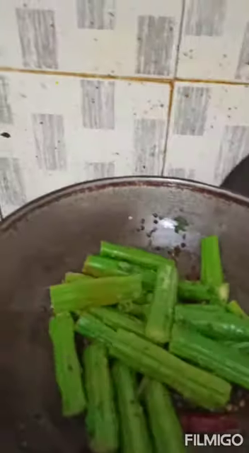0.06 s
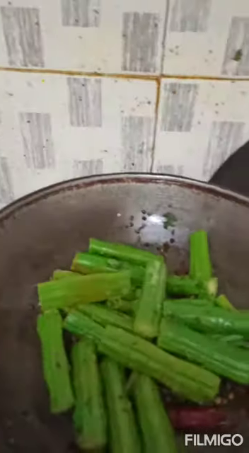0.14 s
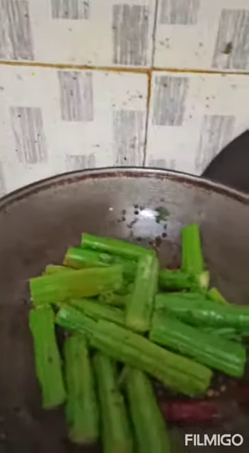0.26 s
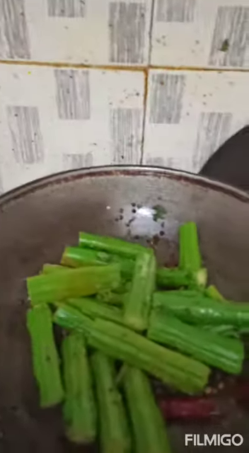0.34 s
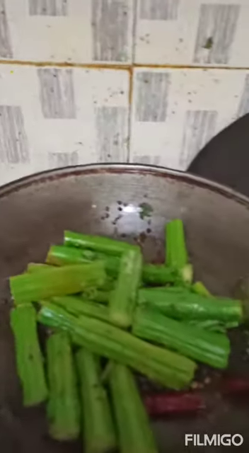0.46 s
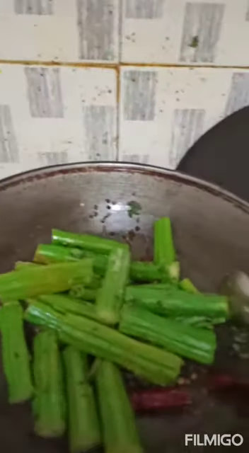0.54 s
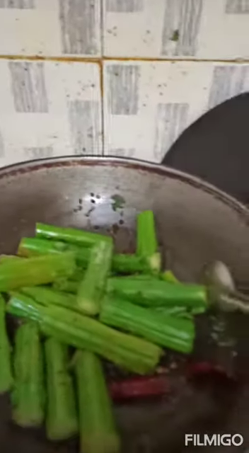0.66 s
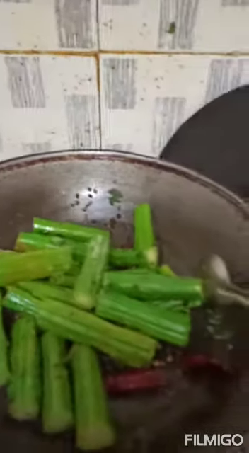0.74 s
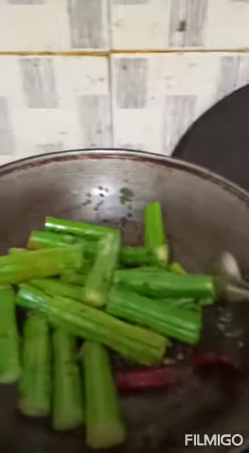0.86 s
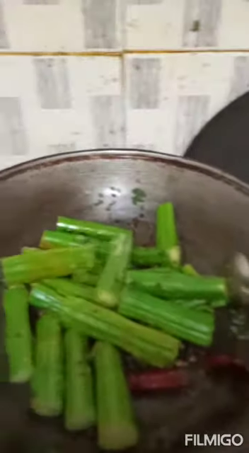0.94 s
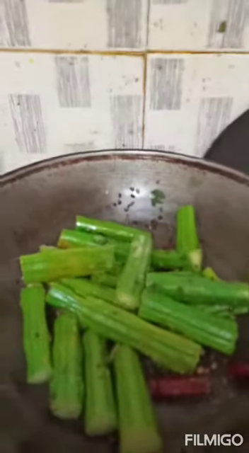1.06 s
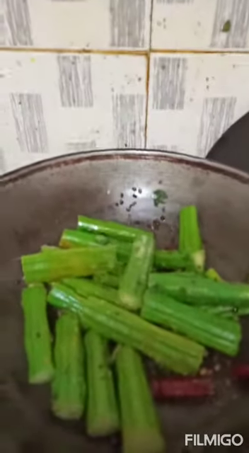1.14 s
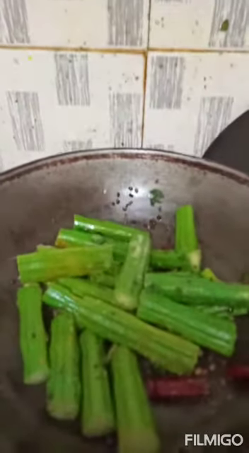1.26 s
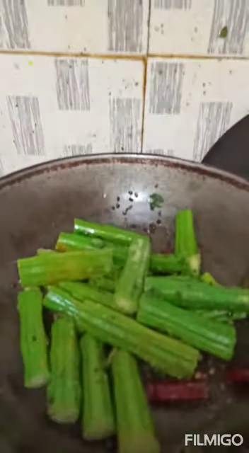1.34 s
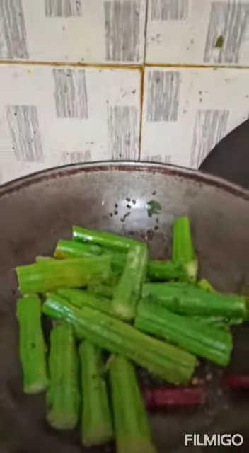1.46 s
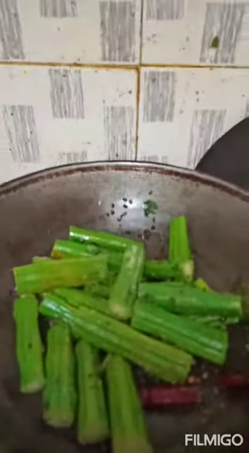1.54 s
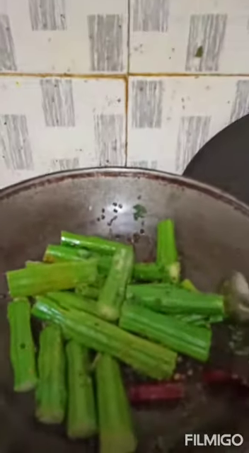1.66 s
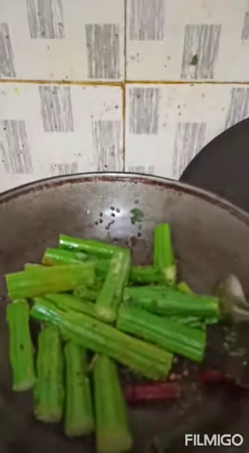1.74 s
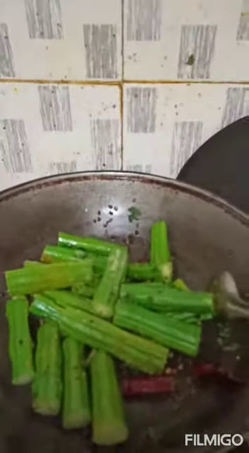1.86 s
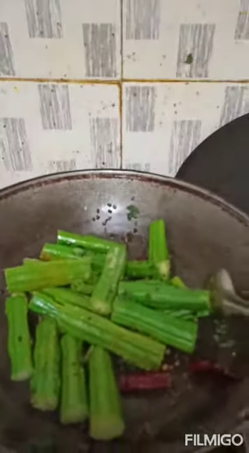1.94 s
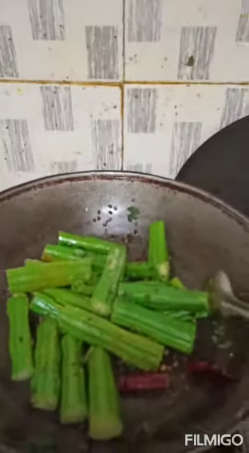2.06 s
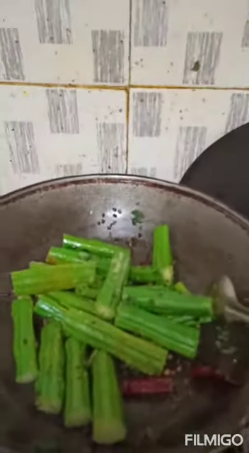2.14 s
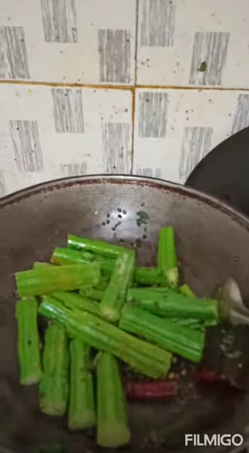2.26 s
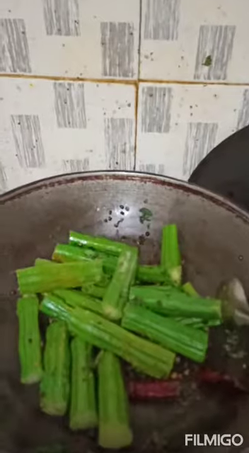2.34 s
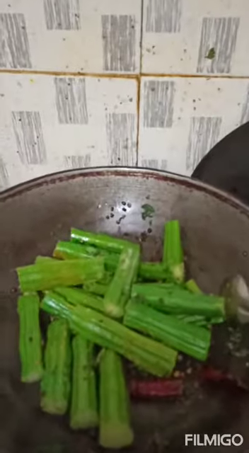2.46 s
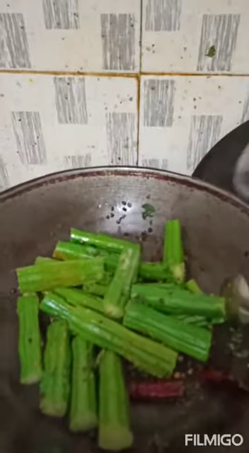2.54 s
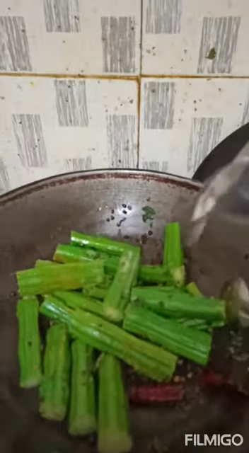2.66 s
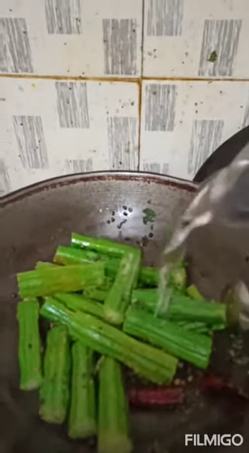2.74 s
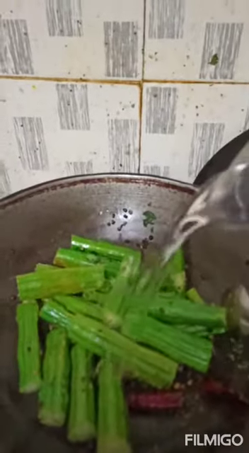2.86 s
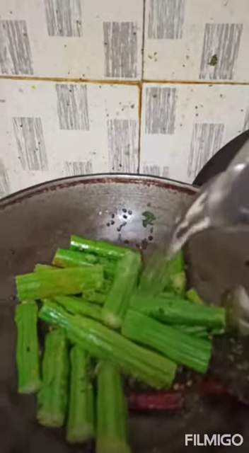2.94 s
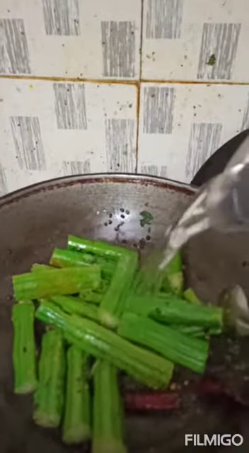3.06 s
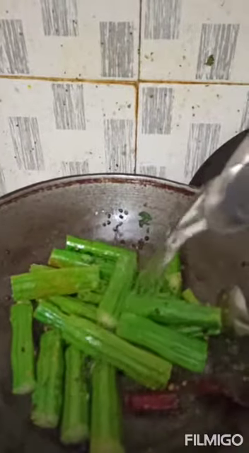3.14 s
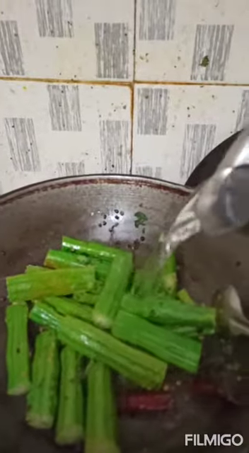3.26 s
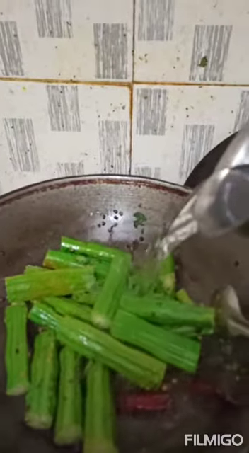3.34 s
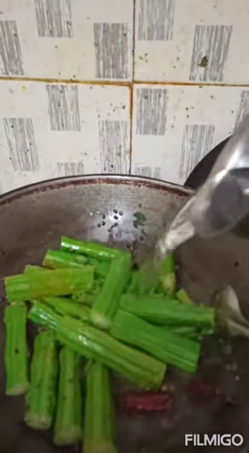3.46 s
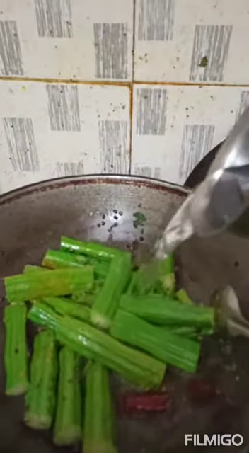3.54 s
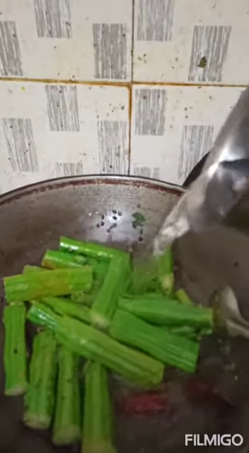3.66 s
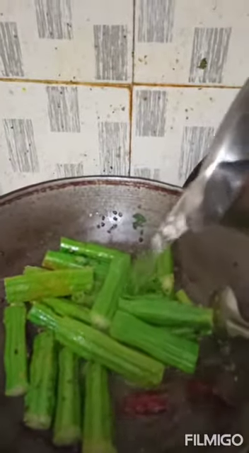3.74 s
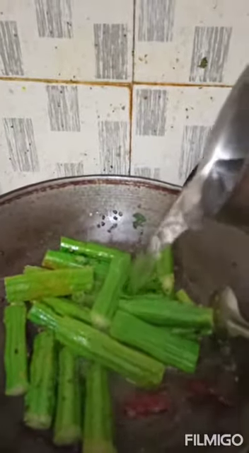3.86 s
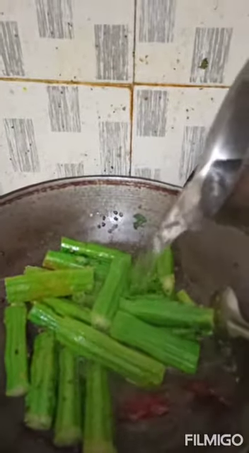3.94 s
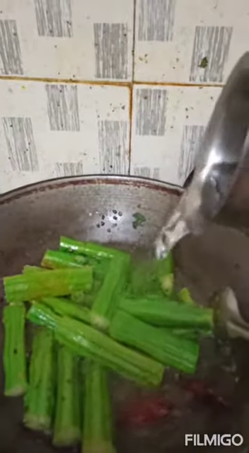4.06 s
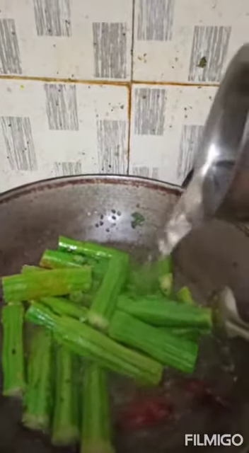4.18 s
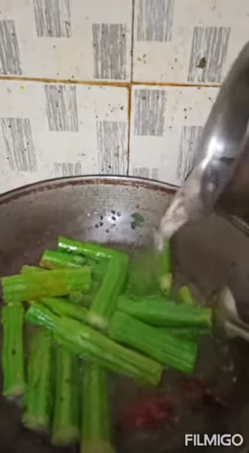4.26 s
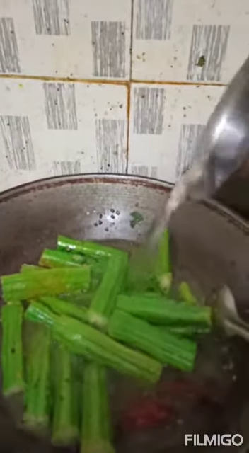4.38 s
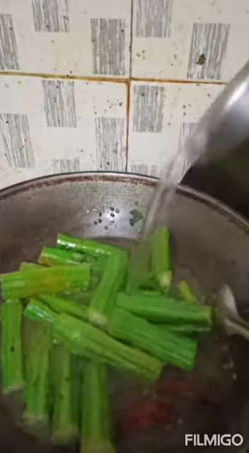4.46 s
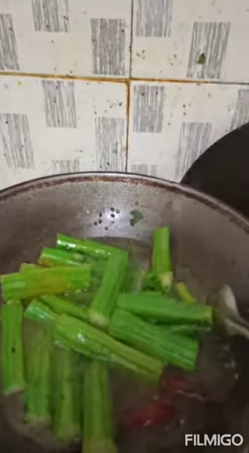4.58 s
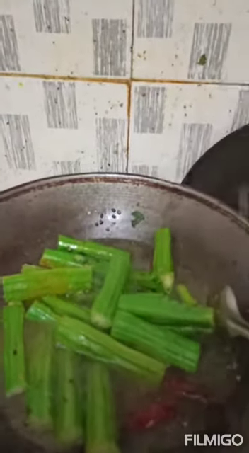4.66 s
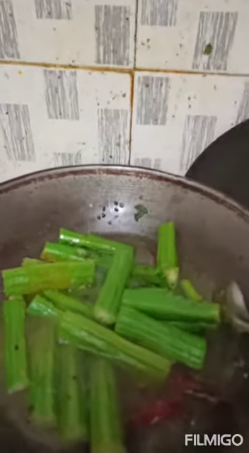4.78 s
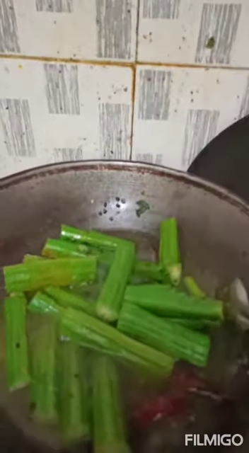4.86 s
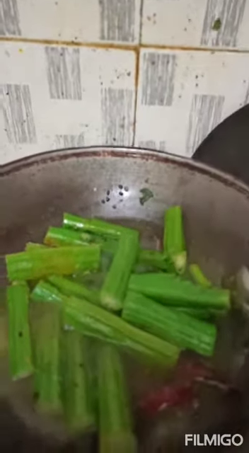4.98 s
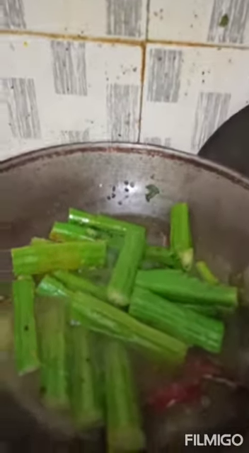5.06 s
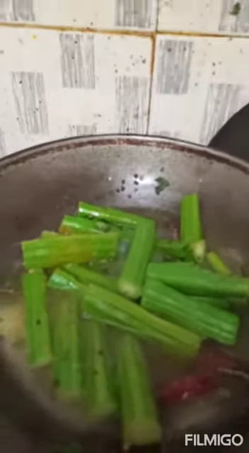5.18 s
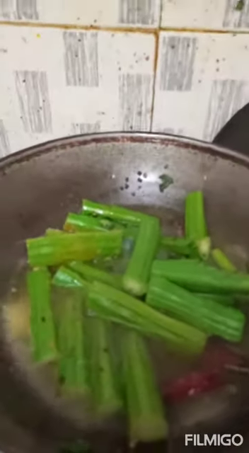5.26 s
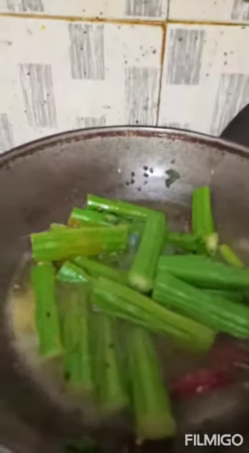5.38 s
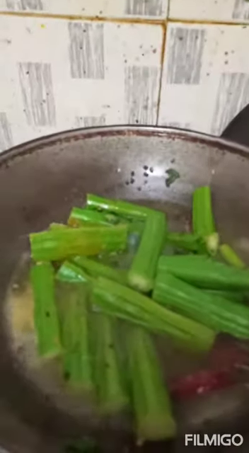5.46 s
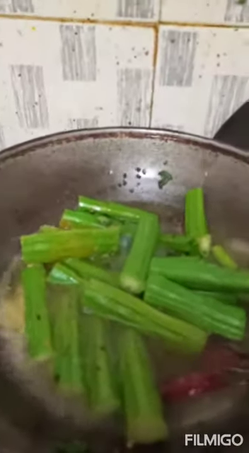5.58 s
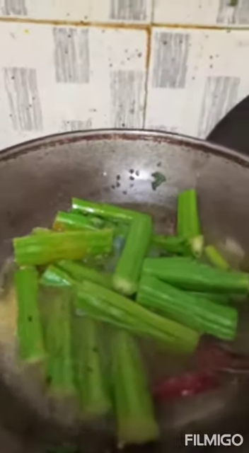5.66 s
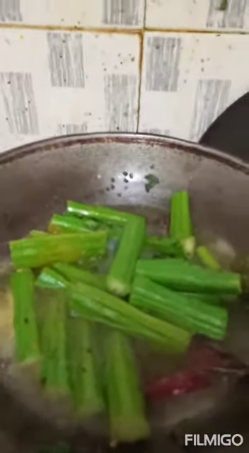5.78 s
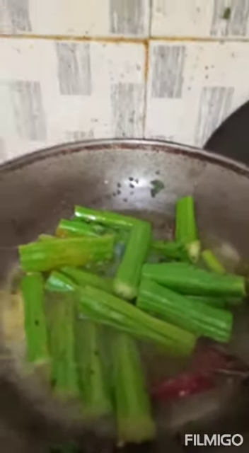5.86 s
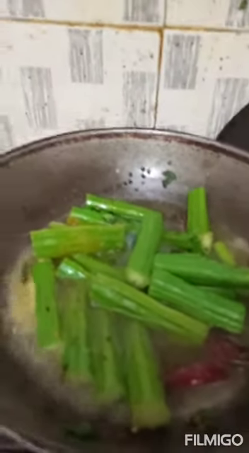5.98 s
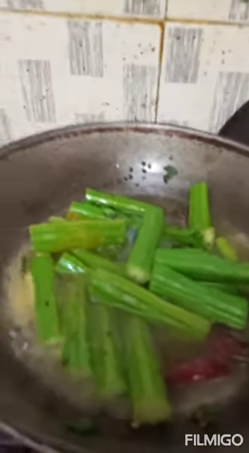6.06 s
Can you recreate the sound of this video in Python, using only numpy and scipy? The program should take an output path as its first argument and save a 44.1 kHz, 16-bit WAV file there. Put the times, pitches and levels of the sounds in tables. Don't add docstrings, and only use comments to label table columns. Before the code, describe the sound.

A crisp, moderately quiet frying sizzle with scattered snapping droplets, heard close in stereo. About halfway, poured water makes a strong burst of steam and a few sharp spits, then the sound falls to a duller simmer with small rising bubble tones and a humming pan. Near the end a metal jug is set down with a clank and small rebounds. Faint kitchen rumble behind; slightly rough phone treble.

```python
import sys
import numpy as np
from scipy import signal
from scipy.fft import rfft, irfft
from scipy.io import wavfile
from scipy.ndimage import uniform_filter1d

SR = 44100
rng = np.random.default_rng(int(sys.argv[2]) if len(sys.argv) > 2 else 0)


def amplitude_ratio(level_db):
    exponent = np.asarray(level_db, float) / 20
    return 10 ** exponent


def to_wav(s):
    ch = np.atleast_2d(s).T
    pcm = np.round(np.clip(ch, -1, 1) * 32767)
    wavfile.write(sys.argv[1], SR, pcm.astype(np.int16))


N = 269926
TIME = np.arange(N) / SR
HZ = np.maximum(np.arange(N // 2 + 1) * SR / N, 1)


def unit(x):
    return x / np.sqrt(np.mean(x ** 2))


def along(table, hz):
    points = np.array(table)
    return np.interp(np.log(hz), np.log(points[:, 0]), points[:, 1])


def walk(rate):
    hold = int(SR / rate)
    steps = np.repeat(rng.standard_normal(N // hold + 1), hold)
    slewed = uniform_filter1d(uniform_filter1d(steps, hold), hold)
    return unit(slewed[:N])


def pair(likeness):
    mid, side = rfft(rng.standard_normal((2, N)))
    return np.sqrt(1 + likeness) * mid + np.sqrt(1 - likeness) * side * np.array([[1], [-1]])


def puffs(rate, spread_db, fade_s):
    when, size = rng.random((2, N))
    power = (when < rate / SR) * amplitude_ratio(-2 * spread_db * np.log(size + 0.0023))
    fade = np.exp(-1 / (fade_s * SR))
    burst = signal.lfilter([1], [1, -fade], power)
    return burst / burst.mean()


def ring(x, modes, turn):
    out = 0
    for k, (hz, db, t60) in enumerate(modes):
        pole = np.exp(2j * np.pi * hz / SR - np.log(1000) / (t60 * SR))
        mode = signal.lfilter([1], [1, -pole], x)
        out = out + amplitude_ratio(db) * np.imag(np.exp(1j * turn * k) * mode)
    return out


def depth(t, hz=700):
    half_full_s, rise_s, lag_s_per_octave = 3.6, 0.24, 0.24
    late = lag_s_per_octave * max(np.log2(700 / hz), 0)
    return .5 + .5 * np.tanh((t - half_full_s - late) / rise_s / 2)


def size_db(hz, t):
    # f/Hz, share of steam swing followed/0-1, full-water gain/dB
    sizes = [(350, 0.52, 13), (1090, 0.66, 6.5), (3500, 0.86, 1.5), (7000, 1.01, -1), (12600, 0.76, -2.5)]
    # t/s, level/dB, spray over fizz/dB
    boil = [(0, -28.5, 0), (.5, -29.5, -0.5), (1.1, -29.5, -0.5), (1.77, -30, 0), (2.42, -31.5, 0.5),
            (2.56, -29.5, 0), (2.73, -34, 0), (3.08, -28, 0.5), (3.24, -21.5, -0.5), (3.43, -18, -0.5),
            (3.6, -19, -2), (3.82, -19.5, -2), (3.99, -22, 0), (4.22, -24, 2.5), (4.32, -22, 2.5),
            (4.67, -27.5, -1), (5.28, -28, 0), (6.12, -31.5, 0.5)]
    spray_hz = [4700, 6100]
    # t/s, extra spray/dB
    jolts = [
        (.8, 0.5),
        (2.55, -1.5),
        (3.39, -0.5),
        (4.005, 6.5),
        (4.06, 1),
        (4.3, -1),
    ]
    jolt_fade_s = 0.04
    size_hz, follow, wet_db = np.transpose(sizes)
    s, steam_db, spray_db = np.transpose(boil)

    def at_size(values):
        return np.interp(np.log(hz), np.log(size_hz), values)

    fine = np.interp(hz, spray_hz, [0, 1])
    jolt = sum(db * (t >= at) * np.exp(-abs(t - at) / jolt_fade_s) for at, db in jolts)
    steam = np.interp(t, s, steam_db) + 30
    steam = steam + (fine - .5) * np.interp(t, s, spray_db) + fine * jolt
    return at_size(follow) * steam + at_size(wet_db) * depth(t, hz)


def sizzle():
    # f/Hz, level per Hz/dB
    fry = [(150, -32.5), (200, -30), (320, -23), (400, -25), (560, -25.5), (750, -13.5), (1150, -14.5),
           (2150, -10.5), (2900, -3.5), (3680, -2.5), (4700, -2.5)]
    # f/Hz, likeness/0-1
    likeness = [(100, 0.97), (300, 0.46), (600, 0.36), (1000, 0.41), (1800, 0.54), (8000, 0.2)]
    # f/Hz, left minus right/dB
    lean = [(100, -6), (250, 5.5), (600, -0.5), (1200, -4.5), (2300, 5.5), (4000, 1), (8000, -3.5),
            (14000, -0.5)]
    # f/Hz, right ahead/rad
    port_turn = [(300, 0.67), (600, 0.16), (1000, 1.44), (2400, 1.24)]
    # f/Hz, width/Hz, gain/dB
    pan_ring = [(162, 20, 10), (455, 20, 9), (597, 31, 8.5), (880, 20, 4.5), (980, 20, 0.5), (1214, 40, 6),
                (1306, 26, 4.5), (1724, 34, 7.5), (1886, 20, 5.5), (2130, 51, 3.5), (2380, 32, 8.5),
                (2485, 16, 5), (3576, 25, 5.5), (7350, 30, 2.5)]
    fizz_db = -34
    noise = pair(np.clip(along(likeness, HZ), 0, 1))
    noise = noise * np.exp(np.outer([0, 1j], along(port_turn, HZ)))
    cracks = puffs(400, 2.6, 0.00075)
    surge, near = walk(24), walk(18)
    surge = surge - uniform_filter1d(surge, size=9000)
    near = near - uniform_filter1d(near, size=9000)
    out = 0
    for hz in 150 * 2 ** np.arange(0, 7, .5):
        mask = np.cos(np.pi * np.clip(np.log2(HZ / hz), -.5, .5))
        near = 1.076 * near + 0.17 * walk(20)
        db = fizz_db + size_db(hz, TIME) + 0.49 * surge + (0.38 + 250 / hz) * near
        crisp = min(hz / 2500, 1)
        power = 1 + crisp * 0.23 * cracks + 0.27 * puffs(hz / 12, 1.4, 3.3 / hz)
        out = out + amplitude_ratio(db) * np.sqrt(power / power.mean()) * irfft(noise * mask, N)
    flat_top = np.clip(HZ, 0, 4650)
    colour = amplitude_ratio(along(fry, flat_top) + along(lean, HZ) * np.array([[.5], [-.5]]))
    for hz, width, db in pan_ring:
        colour = colour * (1 + (amplitude_ratio(db) - 1) / (1 + (2 * (HZ - hz) / width) ** 2))
    return irfft(rfft(out) * colour, N) * amplitude_ratio(9.5)


def pops():
    # t/s, peak/dB, ring f/Hz, left minus right/dB
    droplets = [(0.158, -12, 7600, -14), (0.323, -16, 3780, -1), (0.4643, -13, 4170, 0),
                (0.655, -12, 6400, -4), (0.7083, -12, 7000, -11), (0.7596, -18, 7400, -3),
                (0.796, -12, 6640, 8), (1.4516, -24, 7510, 10), (1.576, -18, 7900, -3),
                (1.618, -12, 6400, -6), (1.704, -19, 3570, -15), (1.809, -28, 7370, 8),
                (2.4701, -17, 3850, -12), (2.558, -11, 7500, 0.5), (2.58, -30, 7530, -12),
                (2.7894, -13, 7700, -12.5), (2.8588, -16, 6840, -15), (2.9264, -12, 7460, -18),
                (2.9685, -12.5, 7000, 6), (3.329, -5, 6440, 13), (3.681, -9, 7360, 9),
                (4.0044, -2, 6100, -23), (4.253, -14, 6140, 5), (4.5145, -12, 7560, -11),
                (4.765, -11, 4100, -34), (5.3334, -12, 7500, -7), (5.7505, -19, 6900, -20),
                (5.917, -12, 7500, 25), (6.0028, -19, 2740, -1)]
    out, age = np.zeros((2, N + 512)), np.arange(512) / SR
    for t, db, hz, pan_db in droplets:
        snap = 0.33 * np.gradient(rng.standard_normal(512))
        crack = (np.sin(2 * np.pi * hz * age) + snap) * np.exp(-age * hz / 9)
        crack = crack - uniform_filter1d(crack, size=40)
        side_db = np.clip([[pan_db], [-pan_db]], -6, 6) / 2
        i = int(t * SR)
        out[:, i:i + 512] += amplitude_ratio(db - 6.0 + side_db) * crack
    return out[:, :N]


def bubbles(count=260):
    pool_db = -58
    out, age = np.zeros((2, N + 4096)), np.arange(4096) / SR
    for when, pitch, size, side in rng.random((count, 4)):
        t = 3.2 + when * 3.4
        hz = 380 * 2 ** (2.2 * pitch)
        swell = age * hz * np.exp(-age * hz / 1.88)
        tone = np.sin(2 * np.pi * hz * age * (1 + 0.015 * hz * age)) * swell
        db = pool_db + size_db(350, t) - 3.0 * np.log(size + 0.0085)
        i = min(int(t * SR), N)
        out[:, i:i + 4096] += amplitude_ratio(db) * tone * np.array([[0.26 + side], [1.3 - side]]) ** .5
    return out[:, :N]


def jug():
    # t/s, peak/dB, wall ring/dB, counter thud/dB
    knocks = [
        (5.545, -36, -30, -16),
        (5.567, -8.5, -15, -5),
        (5.577, -18, -2, -2),
        (5.586, -21, -12, -4),
        (5.605, -32.5, 15, -2),
        (5.621, -24, -16, -8),
        (5.695, -25, -16, -20),
        (5.721, -18, -16, -1),
        (5.81, -43, 13, 4),
        (5.858, -40, -7, -3),
    ]
    # f/Hz, level/dB, t60/s
    thud_modes = [(161.6, -6, 0.22), (277, -11, 0.073), (347, -1.5, 0.075), (428, -4.5, 0.064),
                  (550, -7, 0.083)]
    # f/Hz, level/dB, t60/s
    base_modes = [(670, -11, 0.062), (778, -6, 0.072), (899, 1.5, 0.076), (946, 4.5, 0.051),
                  (1010, -2, .06), (1230, 0, .05), (1610, -4, .1)]
    # f/Hz, level/dB, t60/s
    wall_modes = [(2280, -3, 0.17), (2430, -1.5, 0.082), (4100, -28, .05)]
    sing_s, sing_db = 3.2, -27
    rise_db_per_s, fall_db_per_s = 327, 60
    hits = np.zeros((3, N))
    for t, db, wall_db, thud_db in knocks:
        hits[:, int(t * SR)] = amplitude_ratio(db - 5.5 + np.array([0, wall_db, thud_db]))
    scrape = signal.lfilter([1], [1, -np.exp(-1 / (0.018 * SR))], hits)
    hits = hits + 0.03 * scrape * rng.standard_normal(N)
    hits[::2] = uniform_filter1d(hits[::2], size=18)

    def port(turn):
        base = ring(hits[0], base_modes, turn)
        wall = ring(hits[1], wall_modes, turn)
        return base + wall + ring(hits[2], thud_modes, 0.54 * turn)

    clank = rfft([port(0.626), port(1.194)])
    clank = irfft(clank / (1 + (130 / HZ) ** 4), N)
    sing = unit(irfft(pair(.5) / (1 + ((HZ - 2340) / 110) ** 2), N))
    swell_db = np.minimum(rise_db_per_s * (TIME - sing_s), fall_db_per_s * (sing_s - TIME))
    return clank + sing * amplitude_ratio(sing_db + swell_db)


def kitchen():
    # f/Hz, level per Hz/dB
    rumble = [(15, -36), (25, -15), (48, -39), (68, 2.5), (157, 6), (173, 1.5), (200, -24), (260, -38),
              (440, -120)]
    # t/s, level/dB
    gulps = [
        (3.6, -54),
        (3.86, -49),
        (4.07, -51),
        (4.42, -52),
        (4.96, -46),
    ]
    gulp_s = 0.054
    wet = depth(TIME)
    passing_db = 9 * np.exp(-((TIME - 0.52) / 0.25) ** 2)
    roar = unit(irfft(pair(0.82) * amplitude_ratio(along(rumble, HZ)), N))
    roar = roar * amplitude_ratio(-64.5 + 5 * depth(TIME, 160) + 0.33 * passing_db + 1.7 * walk(13.0))
    drone = unit(irfft(pair(0.38) / (1 + ((HZ - 124) / 7) ** 2), N))
    drone = drone * amplitude_ratio(-64.5 + 3 * wet + passing_db + 1.1 * walk(4.93))
    hum = amplitude_ratio(-65.5 + 15 * wet + 3.5 * walk(8.3))
    hum = hum + sum(amplitude_ratio(db) * np.exp(-((TIME - t) / gulp_s) ** 2) for t, db in gulps)
    bowl = hum * unit(irfft(pair(0.99) / (1 + ((HZ - 397) / 14) ** 2), N))
    ground = amplitude_ratio(-77) * unit(irfft(pair(.4) / (1 + (HZ / 35) ** 2), N))
    return ground + roar + drone + bowl


def scene():
    turn_db_per_s = 0.1
    drift_db = turn_db_per_s * (TIME - TIME[-1] / 2) * np.array([[.5], [-.5]])
    pan = sizzle() + pops() + bubbles()
    return pan * amplitude_ratio(drift_db) + jug() + kitchen()


def patches(x):
    # f/Hz, share kept/0-1
    kept_share = [(0, .93), (500, .96), (600, 1), (8500, 1), (8800, .75), (9300, .2), (9900, .2),
                  (10500, .08), (11000, .02), (11100, 1)]
    hz, t, z = signal.stft(x, SR, nperseg=2048)
    chance = rng.random((len(hz) // 11 + 1, z.shape[-1]))
    chance = np.repeat(chance, 11, axis=0)[:len(hz)]
    share = np.interp(hz, *np.transpose(kept_share))[:, None]
    kept = chance < share * (1 - .55 * depth(t) * (share < .9))
    return signal.istft(z * kept, SR, nperseg=2048)[1][:, :N]


def top_cut(x):
    return signal.sosfilt(signal.butter(12, 16670, fs=SR, output="sos"), x)


def record(dry):
    # from f/Hz, level/dB
    shelves = [(4750, -5.5), (6100, 3), (7650, 0.5), (8520, -8.5), (9600, -12.5), (11000, -96),
               (11600, -5.5), (12950, -3), (15500, -97.5)]
    edge_hz, db = np.transpose(shelves)
    shelf = np.append(0, db)[np.searchsorted(edge_hz, HZ)]
    shelf = uniform_filter1d(shelf, size=300)
    rounded = 0.81 * np.tanh(dry / 0.79)
    shelved = irfft(rfft(rounded) * amplitude_ratio(shelf), N)
    return top_cut(patches(shelved))


dry = scene()
out = record(dry)
to_wav(out)
```